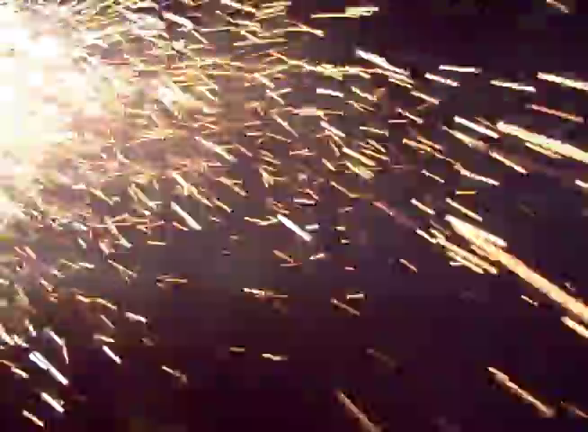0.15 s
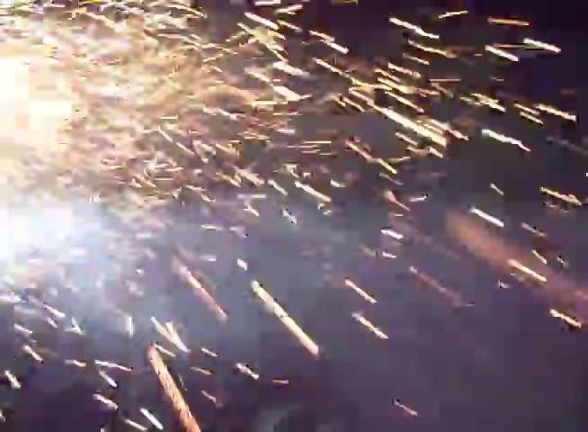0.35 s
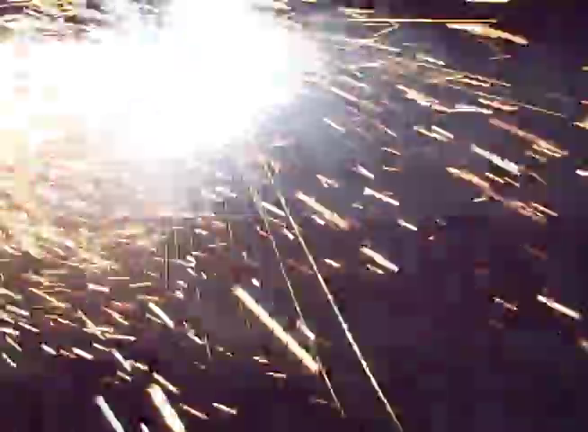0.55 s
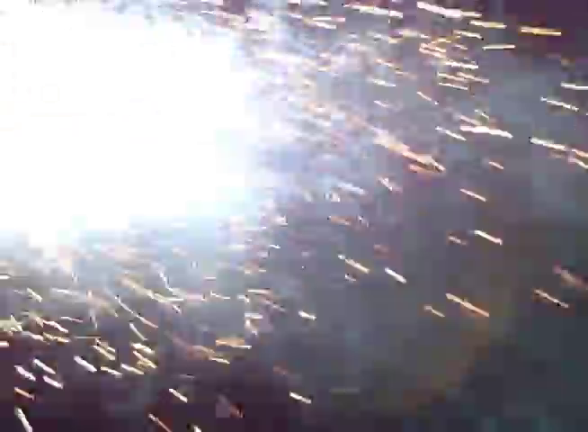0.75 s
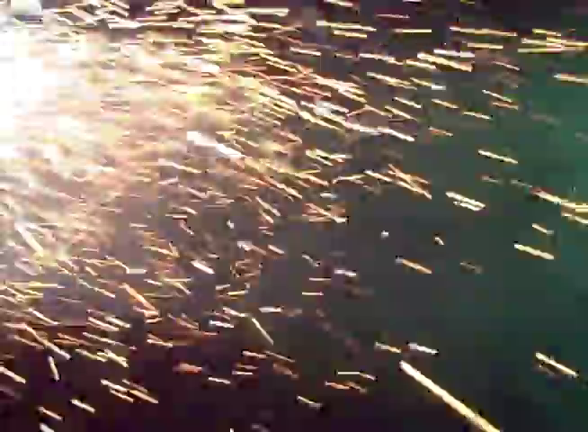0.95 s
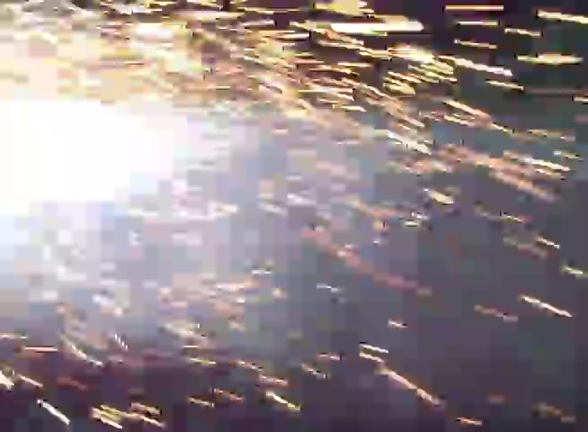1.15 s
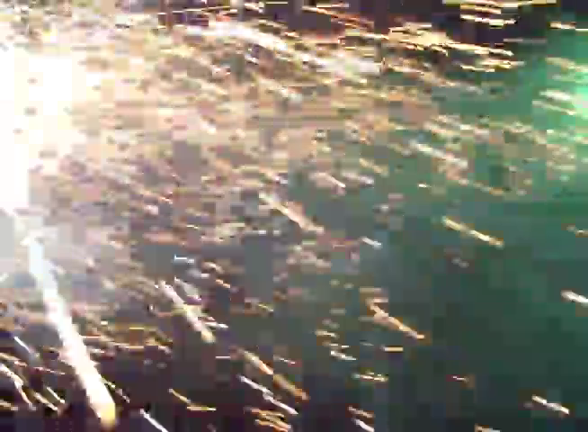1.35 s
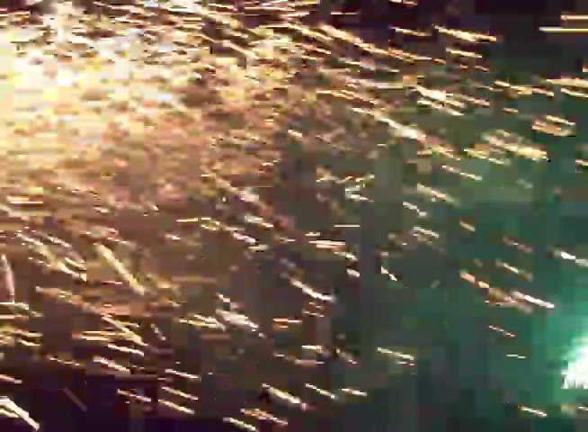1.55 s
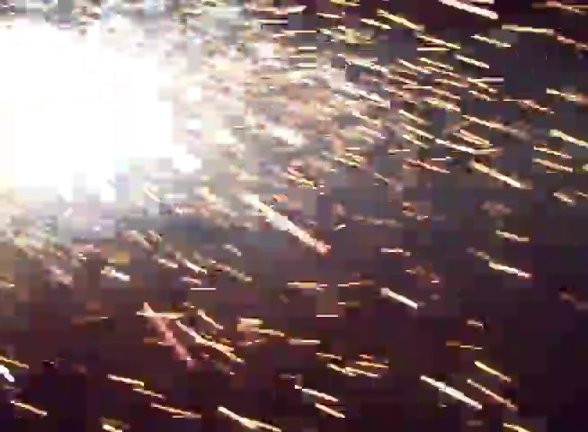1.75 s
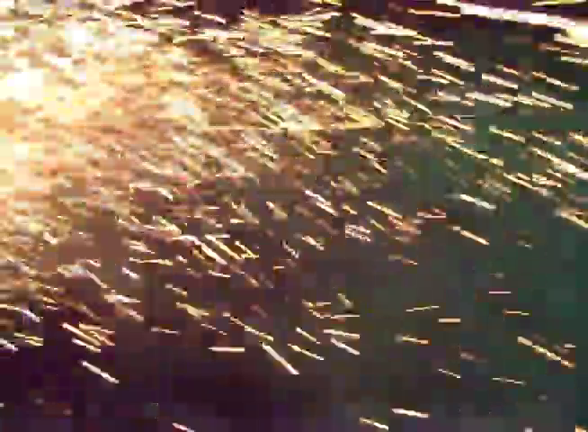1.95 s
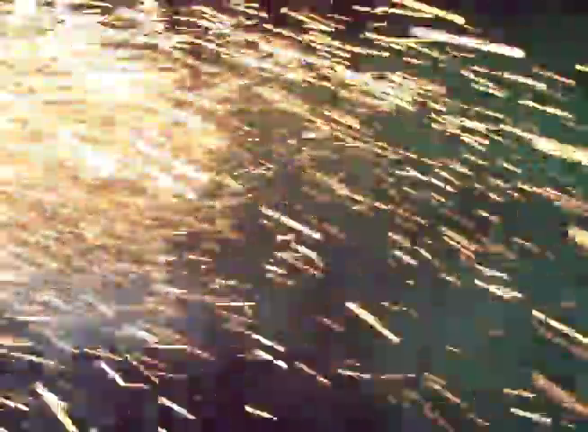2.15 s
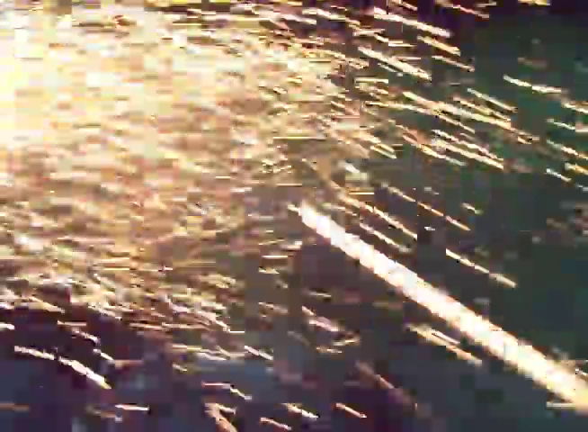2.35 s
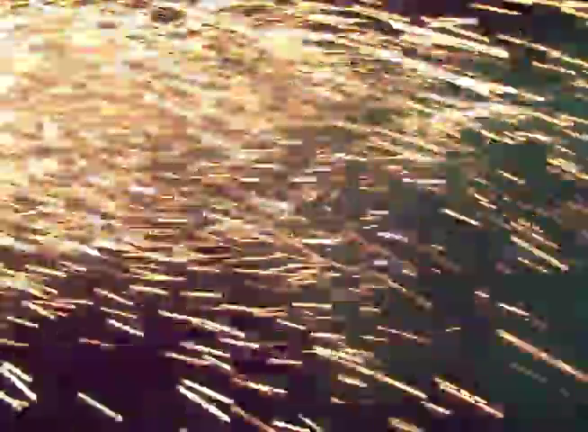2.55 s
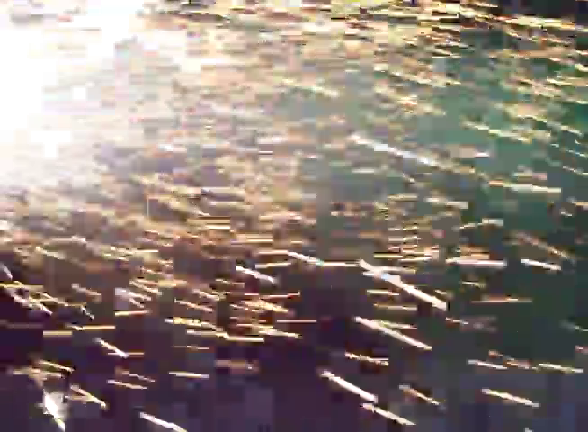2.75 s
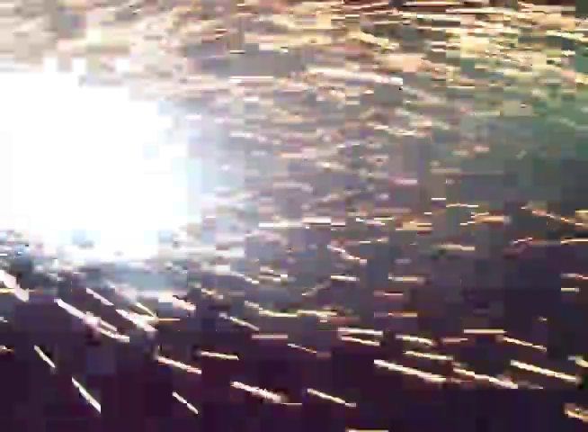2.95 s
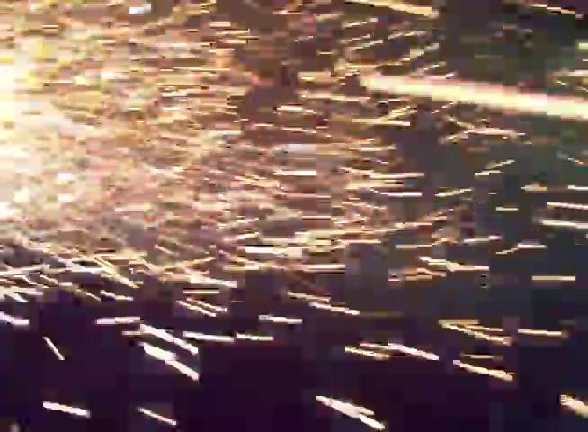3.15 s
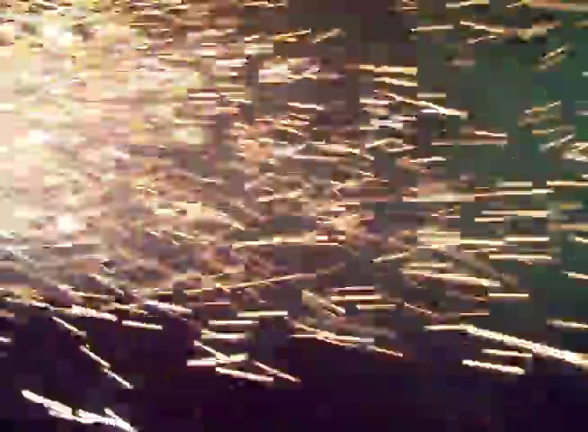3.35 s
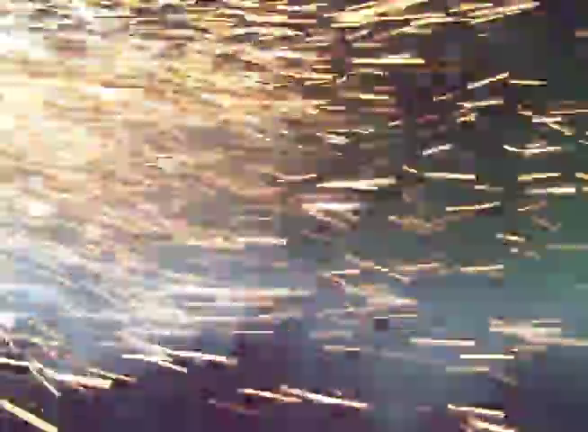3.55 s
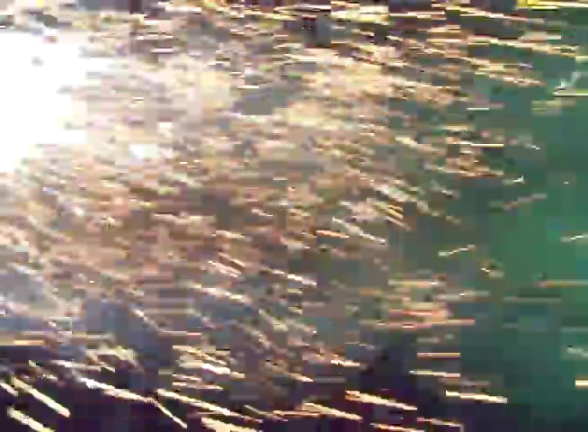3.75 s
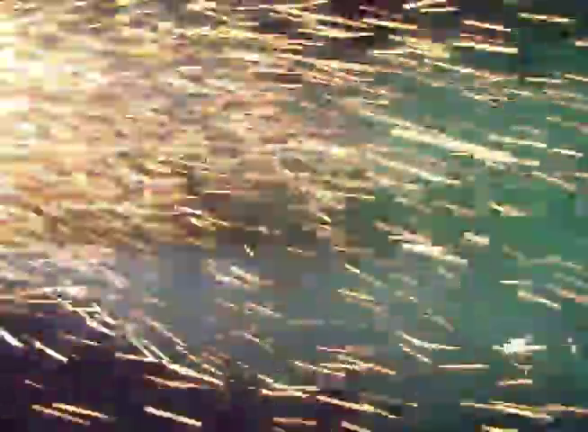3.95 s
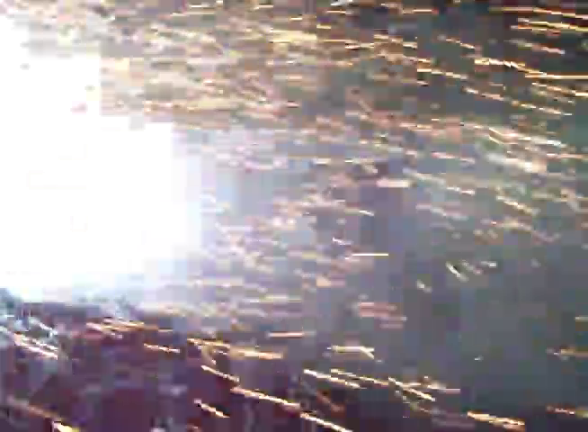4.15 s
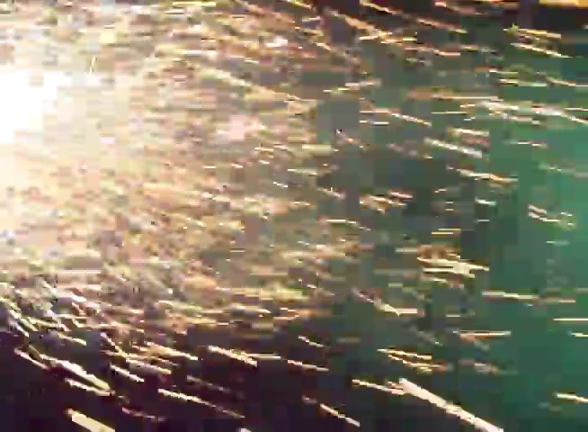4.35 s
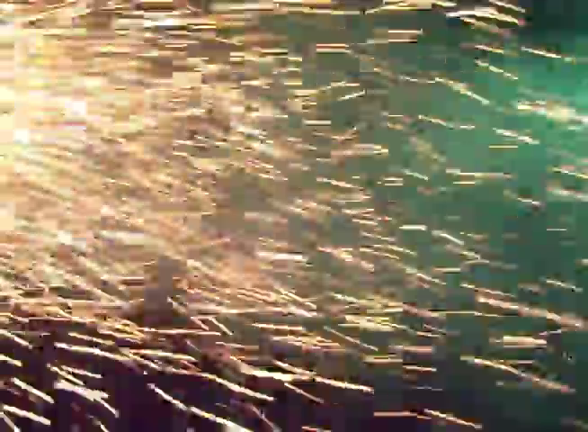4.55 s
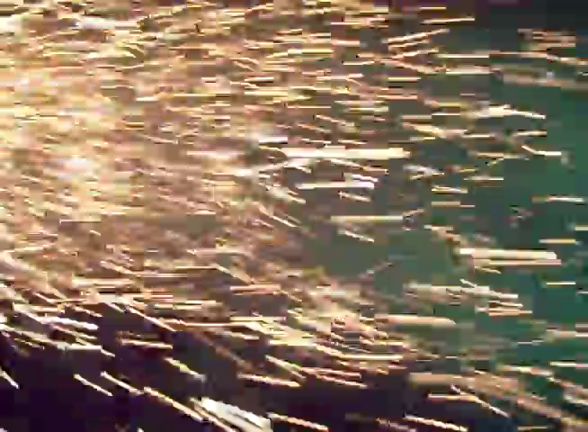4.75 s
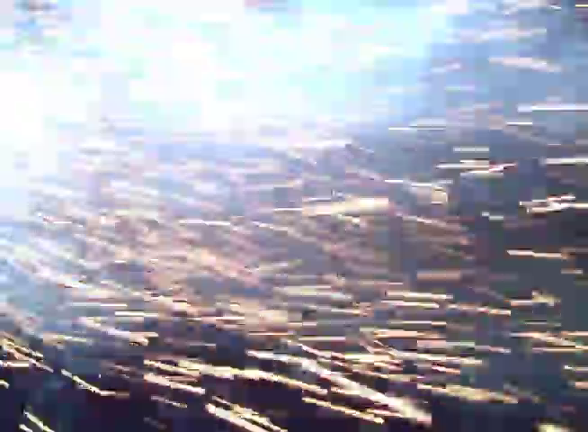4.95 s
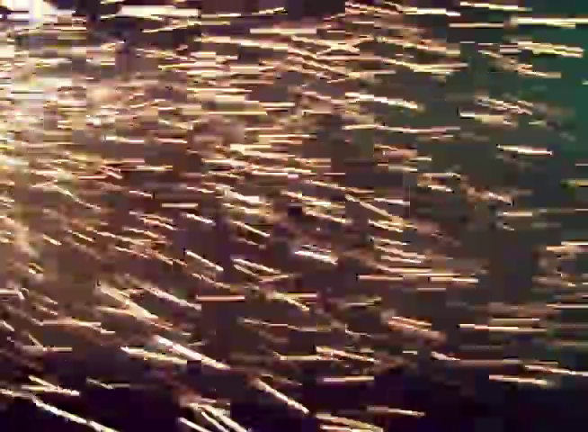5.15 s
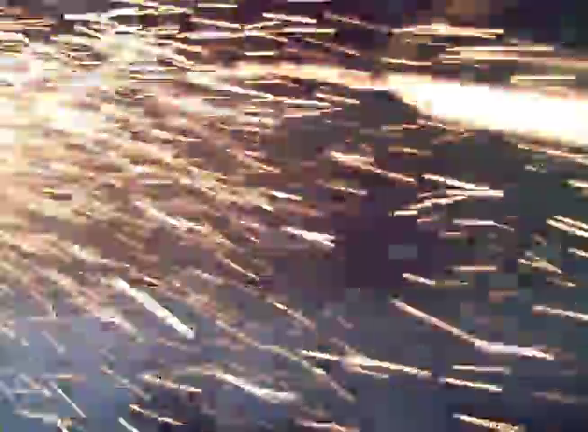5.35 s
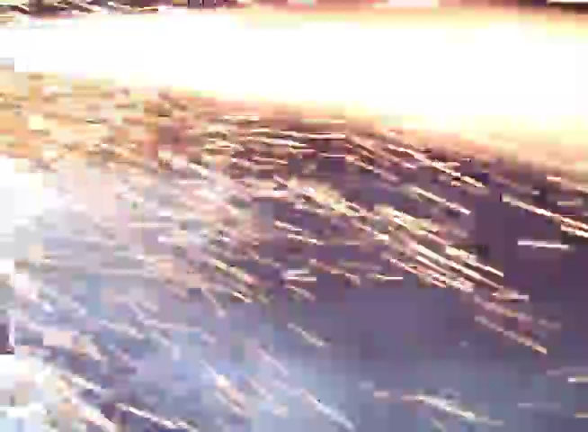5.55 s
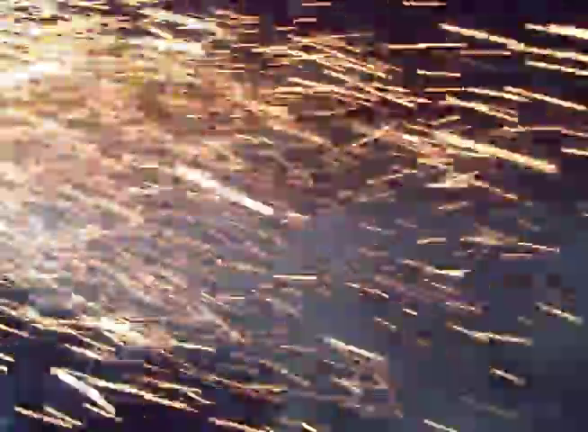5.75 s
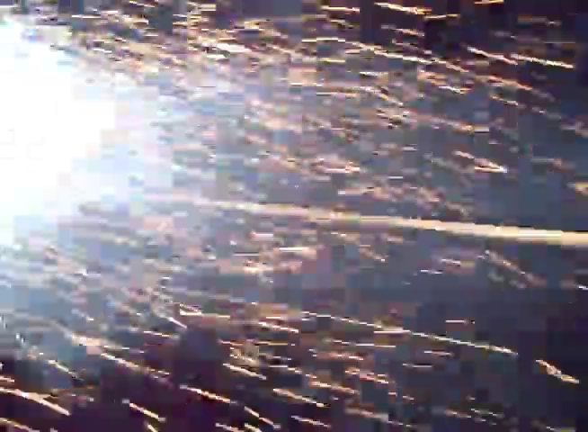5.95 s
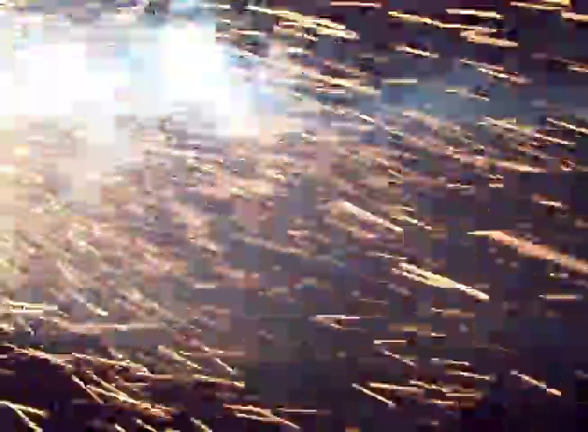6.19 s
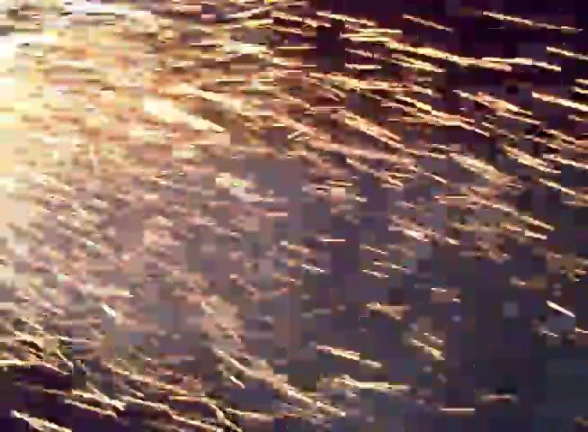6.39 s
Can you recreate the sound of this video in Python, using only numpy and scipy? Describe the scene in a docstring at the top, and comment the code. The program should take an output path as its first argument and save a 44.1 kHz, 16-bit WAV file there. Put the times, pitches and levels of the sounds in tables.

```python
"""A crackling fountain firework sprays sparks over a small microphone outdoors.
A blow just before the start has already pushed the microphone's capsule off its rest point. Sharp cracks
open the sound: bright noise bursts with a sizzle behind. The jet hisses underneath as coloured noise, far
bursts arrive as dull pops, and the nearest bursts jolt the capsule again. The crackle thins out between
about 4.6 and 5.1 s, then grows dense and strong, and the last moment is left to the jet and faint ticks."""
import sys
import numpy as np
from scipy import signal
from scipy.fft import rfft, irfft
from scipy.io import wavfile
from scipy.ndimage import uniform_filter1d

SR = 44100
rng = np.random.default_rng(int(sys.argv[2]) if len(sys.argv) > 2 else 0)


def persist_wave(psi):
    """Save psi, clipped to +-1, as 16-bit WAV."""
    counts = np.round(np.clip(psi, -1, 1) * 32767).astype(np.int16)
    wavfile.write(sys.argv[1], SR, np.atleast_2d(counts).T)


N = 283122  # length in samples

# The close spark bursts. Each row: start in seconds, energy of the bright edge in dB,
# then body in dB and thump in dB, both counted from the edge.
CLOSE_BURSTS = [(0.015, -15.5, -1.5, -15), (0.023, -7.5, -9, -23), (0.0455, -24, -13, -18),
                (0.0813, -1.5, 4.5, -26), (0.09, -10.5, -9, -19), (0.1028, -21.5, 1, 1.5),
                (0.1405, -13.5, -4, -13), (0.1468, -14.5, -9, -6), (0.165, -29, 5, -12),
                (0.3279, -2.5, -8, -14.5), (0.3493, -31, 3, -4), (0.4235, -21, -5, -23),
                (0.4379, -6.5, -5.5, -6.5), (0.4862, -24, -4, -1), (0.5046, -11, -7, -10),
                (0.521, -14.5, -1, -9), (0.5625, -3, -3, -33), (0.582, -5, -4, -15), (0.8149, -9, -11, -26),
                (0.8641, -10, -3, -17), (0.8658, -10, -7, -11), (0.8848, -26, -1, 0),
                (0.9855, -17.5, -5.5, -22), (0.9952, -17, -11, -10), (1.025, -30, -6, 7),
                (1.1027, -10, -6, -11), (1.129, -14, -2, -11), (1.212, -10.5, -5.5, -22),
                (1.2314, -21, -4, -8), (1.2355, -14, -21, -13), (1.2733, -11, -11, -13),
                (1.3126, -21, -9, -1), (1.3472, -15, 6.5, -9), (1.3572, -11.5, 3, -11),
                (1.4043, -7.5, -16, -23), (1.4063, -25, -6, -18), (1.4737, -13, -6.5, -27),
                (1.5951, -9, -5.5, -36), (1.6405, -6, -10.5, -10), (1.6573, -19, -9, -9),
                (1.6685, -14, -17, -16), (1.7839, -24.5, -7, -14), (1.8139, -13.5, -10, -16),
                (1.9199, -2.5, -5, -18), (1.927, -12.5, -9, -19), (2.1947, -12.5, -6, -12),
                (2.1986, -10.5, -8, -15), (2.2154, -11.5, -12, -32), (2.2175, 1.5, -9, -19),
                (2.2554, -15, -16, -9), (2.2822, -7, -9, -20), (2.2871, -18.5, 3, -10),
                (2.3781, -21, -8, -19), (2.381, -30, -12, -5), (2.5633, -28.5, -1, -3),
                (2.7218, -2.5, -3, -22), (2.743, -31, 4, 6), (2.7862, -19.5, -8, -4.5),
                (2.7969, -6, 0.5, -14), (2.909, -22.5, -3, -1), (2.946, -13, 2.5, -6),
                (3.016, -21, -10, -2), (3.062, -20, -9, -5), (3.0748, -16, -3, -2), (3.086, -3, -5, -26),
                (3.0977, -20, 1, -16), (3.1209, -7.5, 2.5, -6.5), (3.1511, -4.5, -11, -31),
                (3.205, -7.5, -8, -15), (3.2084, -8, -6, -13), (3.2979, -7, -7, -11),
                (3.3187, -14.5, 2.5, -2), (3.3312, -12.5, -3, -12), (3.3849, -2, -12, -17),
                (3.4058, -26, 2, 3), (3.4214, -27, 2, 6), (3.4303, -7.5, -6.5, -10.5),
                (3.489, -9.5, -9, -29), (3.5193, -8, 0, -14.5), (3.5408, -29, -2, -12),
                (3.5693, -8.5, -7, -6.5), (3.5864, -23, -9, -23), (3.591, -8, -5, -9),
                (3.622, -21, -2, -12), (3.6285, -1.5, -10.5, -33), (3.774, -20, -9, -3),
                (3.7771, -6.5, -12, -15), (3.826, -3.5, -3, -11), (3.8562, -24, 4.5, 0),
                (3.887, -16, -8, -4), (3.898, -5, -1.5, -26), (3.9929, -18, -7, -5),
                (4.0275, -9.5, -9, -13.5), (4.1177, -2, -2, -32), (4.1396, -26, 4, -4),
                (4.166, -17, -5, -10), (4.1805, -25, -10, 3), (4.2002, -7, -7, -23),
                (4.2098, -9.5, -14, -23), (4.2544, 1, -3, -5.5), (4.2762, -28.5, 10.5, 5),
                (4.3193, -6.5, -6, -10.5), (4.35, -22, 5, -7), (4.4038, -21, -6, -14),
                (4.4064, -10.5, -11, -15), (4.4115, -18, -16, -10), (4.4164, -2.5, -2, -20),
                (4.4388, -35, 8, 3), (4.4856, -13, -10, -25), (4.4995, -14, -3, -1),
                (4.5888, -10, -14, -20), (4.5979, -14, -7, -21), (4.6423, -12, -16, -7),
                (4.8208, -31.5, -7, -20), (5.1058, -32, -1, -20), (5.153, -2.5, -10, -36),
                (5.1596, -4, -14, -32), (5.2139, -0.5, -19, -15), (5.2635, -25, -3, -3),
                (5.2677, -1.5, -6.5, -26), (5.3508, -0.5, -6, -21), (5.3612, -2.5, -3.5, -16),
                (5.3726, -28, 1, -2), (5.3793, -2, -5, -10), (5.4171, -5, -18, -9), (5.4208, -3, -9, -19),
                (5.4288, 3.5, -0.5, -28), (5.4458, -10, 2, -18), (5.45, -26, 7, -1), (5.478, 4, -8, -15),
                (5.4955, -27, -7, -16), (5.5021, -45, 10, 3), (5.5046, -10.5, -1, -9),
                (5.5154, -5.5, -6, -11), (5.523, -5.5, 1, -11), (5.544, -34, 4, 9), (5.569, -27.5, 0, 13),
                (5.6016, -9, -17, -13), (5.6087, -2, -14, -26), (5.6115, -1, -24, -23), (5.6302, -27, 4, 4),
                (5.6335, -27, 5, -1), (5.6849, 0, -3.5, -3.5), (5.7076, -38, 6, 4), (5.724, -6.5, -9, -29),
                (5.795, -8.5, -5, -10), (5.799, -4.5, -7, -13.5), (5.8219, -17, -11, -9),
                (5.8551, -8.5, -10, -8), (5.8875, -3, -16, -21), (5.9404, 0, -7, -30), (5.9627, -34, 2, 0),
                (5.9797, 3, -5.5, -5), (5.9882, -20, -9, -10), (6.0023, -5.5, -11, -8),
                (6.0393, 7, -14, -20), (6.0464, -3.5, -23, -16), (6.0613, -29, 3, 10),
                (6.0694, -24, -4, -12), (6.1048, -17, -14, -9), (6.1188, -10, -8, -14),
                (6.137, -1.5, -6, -11), (6.1427, -6, -1, -5.5), (6.1587, -30, 6, -1),
                (6.1754, -4.5, -21, -10.5), (6.1943, -22, -7, -4), (6.2105, -6, -11, -9),
                (6.239, -4, -13, -19), (6.2953, -2, -5, -30), (6.306, -26, 2, -14), (6.3084, -8.5, -6, -9),
                (6.311, -10.5, -4, -4), (6.3175, -29, 4, -1), (6.336, -9, 0, -26), (6.3483, -6, -1.5, -10),
                (6.3513, -20, -4, -10)]


def cracks():
    """Close bursts: the stronger the burst, the smaller its share of sizzle."""
    start_s, edge_db, body_db, thump_db = np.transpose(CLOSE_BURSTS)
    sizzle_db = -25 - 0.21 * edge_db  # counted from the edge, before the body adds to it
    return bursts(start_s, edge_db, body_db, thump_db, sizzle_db)


# Tone of the three parts of a burst. Each row: frequency in Hz, relative level in dB.
EDGE_TONE = [(3000, -23.5), (7000, -14.5), (8500, -9), (11000, -5), (14500, 1.5), (15600, -1.5),
             (16600, -20.5)]
BODY_TONE = [(1200, -23), (2500, -11.5), (3300, -8), (4400, -1), (5500, -4.5), (7000, -3.5), (10000, -16)]
THUMP_TONE = [(150, 3.5), (500, 2), (1000, 0), (1900, -1.5), (2600, -1.5), (5000, -41)]


def bursts(start_s, edge_db, body_db, thump_db, sizzle_db):
    """A burst has a bright edge, a body near 4 kHz, a thump below and a sizzle behind."""
    edge = fronts(start_s, edge_db, EDGE_TONE, debris_ms=0.13)
    body = fronts(start_s, edge_db + body_db, BODY_TONE, debris_ms=0.17)
    thump = fronts(start_s, edge_db + thump_db, THUMP_TONE, debris_ms=0.14)
    # a body stronger than the edge lifts the sizzle too
    crumbs = sizzle(start_s, edge_db + np.maximum(body_db, 0) + sizzle_db)
    return edge + body + thump + crumbs


def fronts(start_s, energy_db, tone, debris_ms):
    """Each burst is a shock front trailed by ragged debris, coloured and scaled to its energy."""
    ms = np.arange(64) * 1000 / SR
    debris = np.exp(-ms / debris_ms) * rng.standard_normal((len(start_s), len(ms)))
    grains = undb(-2) * debris
    grains[:, 0] += 1  # the shock front itself
    grains = signal.fftconvolve(grains, response(tone)[None, :192], axes=1)
    size = np.sqrt(np.sum(grains ** 2, axis=1))
    grains *= (undb(energy_db) / size)[:, None]
    length = grains.shape[1]
    out = np.zeros(N + length)
    places = (start_s * SR).astype(int)[:, None] + np.arange(length)
    np.add.at(out, places, grains)
    return out[:N]


# Tone of the sizzle and of its longer tail. Each row: frequency in Hz, relative level in dB.
FIZZ_TONE = [(1500, -31), (3000, -11.5), (4500, -4.5), (9000, 3), (13500, 4.5), (15500, 7), (16100, -41),
             (16800, -69)]
AFTERGLOW_TONE = [(1500, -14.5), (3000, -1), (5000, 0), (10000, 2), (13000, -4), (15600, 4), (16000, -54)]


def sizzle(start_s, level_db):
    """Burning crumbs fizz on for a few milliseconds; a weaker, duller part lasts longer."""
    starts = spikes(start_s, undb(level_db))
    fizz = colour(fade(starts, ms=1.82) * rng.standard_normal(N), FIZZ_TONE)
    afterglow = colour(fade(starts, ms=5.9) * rng.standard_normal(N), AFTERGLOW_TONE)
    return fizz + undb(-14) * afterglow


def small_sparks(hiss_db, count):
    """Faint bursts at random times, each one's level set by the hiss at that moment."""
    time_draw, level_draw, body_draw = rng.random((count, 3)).T
    start_s = time_draw * (N - 1) / SR
    extra_db = 11.0 - 4.0 * np.log(1 - np.minimum(level_draw, .97))  # few are much louder
    edge_db = hiss_db[(start_s * SR).astype(int)] + extra_db
    return bursts(start_s, edge_db, body_db=-6 + 14 * body_draw, thump_db=-2.0, sizzle_db=-23.5)


# How fast the capsule drifts back: the cutoffs in Hz of two coupling stages.
SETTLE_CUTOFFS = (10.5, 4.36)
# Blows on the capsule. Each row: start in seconds, shift of the rest point, size of a puff of a few ms,
# both as signed input to the filters below (1 is full scale).
BLOWS = [(-0.0126, -0.31, -0.009), (0.023, -0.21, 0.076), (0.0814, 0.25, 0.064), (0.3272, -0.04, -0.0019),
         (0.5622, -0.094, 0.013), (1.4037, -0.007, 0.004), (1.6402, -0.022, -0.0016), (1.92, -0.29, 0.074),
         (1.9252, -0.03, 0.049), (2.2173, -0.23, 0.055), (2.2829, -0.014, -0.004), (2.721, -0.13, 0.025),
         (3.0638, 0.02, 0.012), (3.0861, -0.33, -0.039), (3.089, -0.024, 0.0098), (3.1209, 0.068, 0.056),
         (3.1514, -0.31, 0.0017), (3.1545, -0.045, 0.044), (3.3836, 0.022, -0.031), (3.6289, -0.22, 0.049),
         (3.898, -0.13, -0.012), (4.1173, -0.38, 0.082), (4.2545, 0.057, 0.043), (4.321, -0.006, -0.006),
         (4.417, -0.015, -0.000013), (5.0814, -0.019, 0.046), (5.153, -0.11, 0.14), (5.16, -0.51, -0.046),
         (5.1628, 0.11, -0.055), (5.2156, -0.056, 0.1), (5.2676, -0.37, -0.03), (5.272, 0.054, -0.021),
         (5.3509, -0.036, -0.013), (5.3787, -0.022, 0.044), (5.4169, -0.076, 0.07), (5.4284, -0.25, -0.03),
         (5.4325, 0.03, -0.034), (5.4458, -0.0066, 0.002), (5.4781, -0.29, -0.12), (5.6088, -0.34, -0.19),
         (5.6116, 0.27, 0.11), (5.685, 0.0086, -0.0048), (5.7962, 0.036, -0.059), (5.941, 0.057, -0.068),
         (5.9792, 0.0047, 0.12), (6.0378, 0.004, -0.0064), (6.0022, -0.019, -0.007), (6.0398, -0.1, 0.033),
         (6.2952, -0.43, -0.11), (6.3087, -0.069, 0.12), (6.3117, 0.034, 0.054), (6.3361, -0.25, -0.029),
         (6.3481, -0.041, 0.075)]


def jolts():
    """A blow shifts the capsule's rest point, which creeps back with an overshoot, and adds a puff."""
    start_s, shift, puff = np.transpose(BLOWS)
    slap = -0.28 * shift - 0.057 * puff  # holds the blow back at first
    lead = SR // 10  # room for the blow that lands before the start
    fast, slow = np.exp(-2 * np.pi * np.array(SETTLE_CUTOFFS) / SR)
    settling = np.convolve([1, -fast], [1, -slow])
    drift = signal.lfilter([1, -1], settling, spikes(start_s, shift, lead))
    puffs = fade(spikes(start_s, puff, lead), ms=4.8)
    slaps = fade(spikes(start_s, slap, lead), ms=0.43)
    return uniform_filter1d(drift + puffs + slaps, size=5)[lead:]


# Dull far pops. Each row: start in seconds, level in dB.
FAR_POPS = [(0.2238, -40), (0.3925, -40), (0.6678, -38.5), (0.8999, -36), (1.1714, -35), (1.2233, -38),
            (1.248, -37.5), (1.627, -38), (1.636, -39), (1.7252, -33.5), (1.9054, -42), (2.0093, -43),
            (2.1027, -37), (2.6177, -37), (2.6716, -41), (2.8097, -42), (2.9254, -32.5), (2.983, -37),
            (3.0, -36), (3.048, -37), (3.598, -42), (3.6584, -37), (3.732, -38), (3.931, -39),
            (3.9849, -32), (4.024, -39), (4.0626, -37), (4.0852, -36), (4.153, -43), (4.191, -41),
            (4.381, -42), (4.8618, -41), (4.9416, -39), (5.0105, -39), (5.111, -38), (5.2265, -36),
            (5.264, -37), (5.309, -33), (5.331, -33), (5.4027, -38), (5.4585, -40), (5.561, -30.5),
            (5.6507, -38), (5.731, -30), (5.8942, -34), (5.9031, -36), (5.9075, -32), (6.057, -32),
            (6.108, -36), (6.162, -35), (6.1779, -36), (6.1865, -36), (6.267, -34.5)]


def pops(roar_db, count):
    """A far burst is a rounded pressure dip under 1 ms, then a long weak rebound; small ones are random."""
    start_s, level_db = np.transpose(FAR_POPS)
    time_draw, level_draw = rng.random((count, 2)).T
    extra_db = 5.0 - 3.3 * np.log(1 - np.minimum(level_draw, .96))
    small_db = roar_db[(time_draw * (N - 1)).astype(int)] + extra_db
    train = spikes(start_s, undb(level_db)) + spikes(time_draw * N / SR, undb(small_db))
    before = 88  # samples of the shape ahead of the deepest point
    ms = np.arange(-before, 400) * 1000 / SR
    dip = np.exp(-(ms / 0.29) ** 2 / 2)
    rebound = np.maximum(ms, 0) * np.exp(-np.abs(ms) / 1.6)
    shape = 1.4 * rebound * dip.sum() / rebound.sum() - dip  # rebound area is 1.4 times the dip's
    return signal.fftconvolve(train, shape)[before:N + before]


# The jet's rise and fall. Each row: time in seconds, roar in dB, hiss in dB (both before the flutter).
JET_COURSE = [(0.0, -60, -58.5), (0.12, -52.5, -55.5), (0.46, -55, -58.5), (0.66, -56.5, -58),
              (0.89, -55, -60.5), (1.3, -55, -58), (2.59, -57.5, -62.5), (2.72, -54.5, -56.5),
              (3.55, -52, -55.5), (3.88, -51.5, -55), (4.13, -55, -57.5), (4.49, -54, -52),
              (4.65, -57.5, -60), (4.92, -55, -60.5), (5.18, -52, -59), (5.36, -45.5, -45.5),
              (5.49, -51.5, -51), (5.72, -47.5, -53), (5.87, -50.5, -55), (6.02, -47, -52.5),
              (6.2, -51, -53.5), (6.42, -54.5, -53.5)]


def jet_levels():
    """Slide in straight lines from row to row, for the roar and for the hiss."""
    time_s, *columns = np.transpose(JET_COURSE)
    return [np.interp(np.arange(N) / SR, time_s, column) for column in columns]


# Tone of the jet's two parts. Each row: frequency in Hz, relative level in dB per Hz.
ROAR_TONE = [(40, 0.5), (110, -5), (500, -3.5), (1270, -3.5), (1750, -4.5), (2250, -7.5), (2500, -17.5),
             (3600, -18.5), (6000, -69)]
HISS_TONE = [(1500, -14), (2600, 4), (3200, 1), (5300, 0.5), (8150, -1.5), (14600, -3.5), (15750, -3),
             (16050, -63)]


def jet(roar_db, hiss_db):
    """Burning gas makes a low roar and a thin hiss: coloured noise whose levels flutter."""
    roar_flutter_db = -0.63 + 2.0 * walk(rate=60)
    hiss_flutter_db = -3.0 + 2.06 * walk(rate=40)
    roar = colour(rng.standard_normal(N), ROAR_TONE) * undb(roar_db + roar_flutter_db)
    hiss = colour(rng.standard_normal(N), HISS_TONE) * undb(hiss_db + hiss_flutter_db)
    return roar + hiss


def walk(rate):
    """Slide between random levels, with `rate` new ones a second."""
    hold = int(SR / rate)
    levels = np.repeat(rng.standard_normal(N // hold + 1), hold)
    return uniform_filter1d(levels, hold)[:N]


def spikes(seconds, sizes, lead=0):
    """One sample of the given size at each time, after `lead` extra samples."""
    out = np.zeros(N + lead)
    places = (np.asarray(seconds) * SR).astype(int) + lead
    np.add.at(out, np.clip(places, 0, N + lead - 1), sizes)
    return out


def fade(x, ms):
    """Every sample dies away with this time constant."""
    return signal.lfilter([1], [1, -np.exp(-1000 / (ms * SR))], x)


def undb(db):
    """Turn dB into a plain factor."""
    return 10 ** (np.asarray(db) / 20)


def gains(tone, size):
    """Read a tone table, on a log frequency scale, at the bins of a transform."""
    hz, db = np.transpose(tone)
    bin_hz = np.arange(size // 2 + 1) * SR / size
    return undb(np.interp(np.log(np.maximum(bin_hz, 1)), np.log(hz), db))


def response(tone):
    """Short filter for a tone table: it reacts at once (minimum phase, via the cepstrum), energy 1."""
    cepstrum = irfft(np.log(gains(tone, size=2048)))
    cepstrum[1:1024] *= 2  # fold the backward half onto the forward half
    cepstrum[1025:] = 0
    taps = irfft(np.exp(rfft(cepstrum)))[:512]
    return taps / np.sqrt(np.sum(taps ** 2))


def colour(x, tone):
    """Give a sound the tone of a table."""
    return signal.fftconvolve(x, response(tone))[:N]


def scene():
    """Add the sparks, the jolts, the far pops and the jet into one channel."""
    roar_db, hiss_db = jet_levels()
    sparks = cracks() + small_sparks(hiss_db, count=500)
    background = pops(roar_db, count=500) + jet(roar_db, hiss_db)
    return (sparks + jolts() + background)[None]


def record(dry):
    """The preamp flattens the loudest fronts; a symmetric top cut rings on both sides of a crack."""
    ceiling = 0.6  # of full scale
    soft = dry / (1 + (np.abs(dry) / ceiling) ** 4) ** .25
    top_cut = signal.ellip(8, .1, 40, 17100, fs=SR, output="sos")  # cutoff in Hz
    return signal.sosfiltfilt(top_cut, soft)  # forward and backward


dry = scene()
out = record(dry)
persist_wave(out)
```